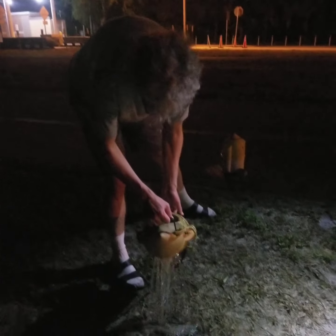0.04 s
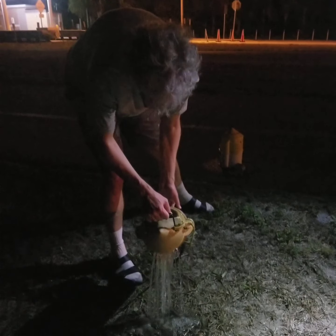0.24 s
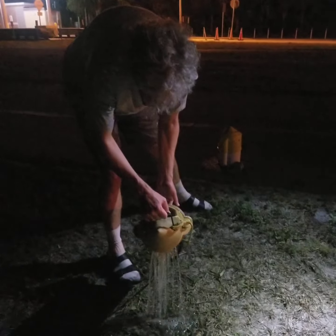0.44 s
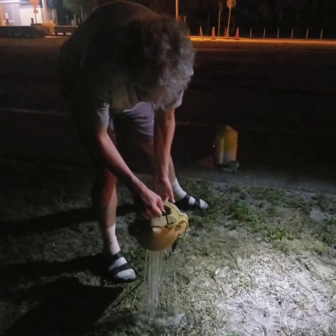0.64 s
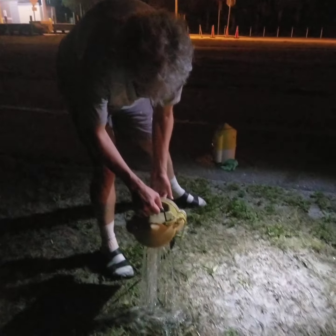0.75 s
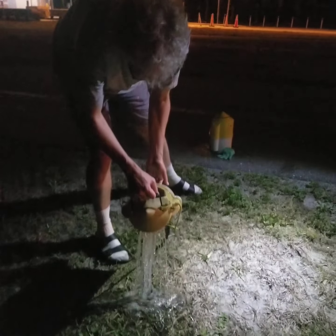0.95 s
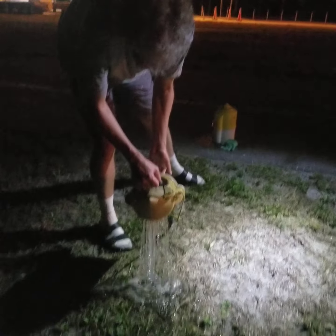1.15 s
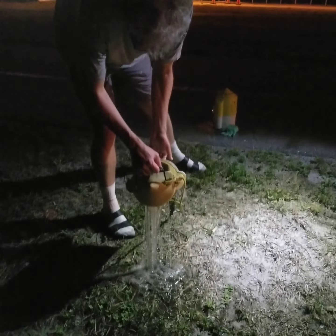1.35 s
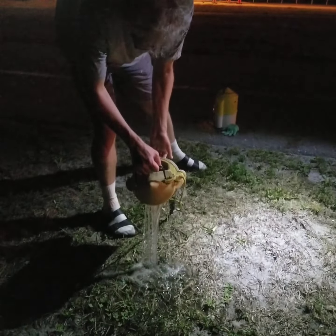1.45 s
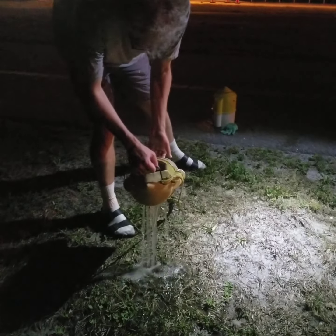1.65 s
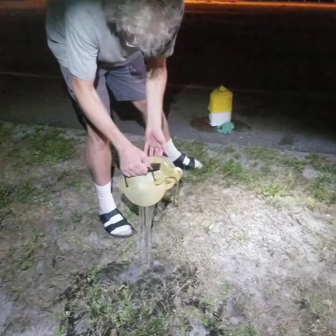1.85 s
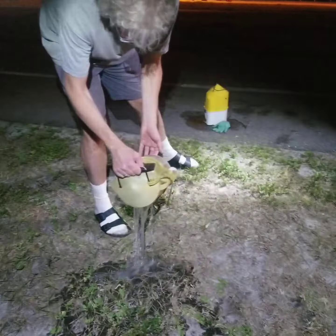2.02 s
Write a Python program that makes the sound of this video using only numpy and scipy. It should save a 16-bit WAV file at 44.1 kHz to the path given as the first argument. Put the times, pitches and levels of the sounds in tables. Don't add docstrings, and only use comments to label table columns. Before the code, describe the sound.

Water from a bucket splashes onto grass. A dense gush swells from 0 to 0.2 s, thuds low near 0.26 s and dies by 0.4 s. Hissing spray swells again around 0.9 s with dull soaking patter and soft glugs. From 1 s a thin stream crackles with sharp bright splats, densest near 1.95 s, continuing to 2.5 s. Low wind bumps, mostly early; very faint road hum.

```python
import sys
import numpy as np
from scipy import signal
from scipy.fft import rfft, irfft, next_fast_len
from scipy.io import wavfile
from scipy.ndimage import uniform_filter1d, map_coordinates

SR = 44100
rng = np.random.default_rng(int(sys.argv[2]) if len(sys.argv) > 2 else 0)


def unload_audio(sound):
    columns = np.transpose(np.atleast_2d(sound))
    steps = np.round(np.clip(columns, -1, 1) * 32767)
    wavfile.write(sys.argv[1], SR, steps.astype(np.int16))


def invert_db(x):
    u = np.asarray(x, float) / 20
    return 10 ** u


N = 110250


def unit(x):
    return x / np.sqrt(np.mean(x ** 2) + 1e-20)


def along(points, hz):
    f, v = np.transpose(points)
    return np.interp(np.log(hz + 1), np.log(f + 1), v)


def curves(rows):
    s, *columns = np.transpose(rows)
    return [np.interp(np.arange(N) / SR, s, column) for column in columns]


def wobble(rate_hz):
    knots = rng.standard_normal(int(N * rate_hz / SR) + 4)
    return map_coordinates(knots, [np.arange(N) * rate_hz / SR])


def filtered(x, response):
    m = next_fast_len(N + SR // 4)
    return irfft(rfft(x, m) * response(np.fft.rfftfreq(m, 1 / SR)), m)[..., :N]


def patchy(patchy_db):
    z = signal.stft(rng.standard_normal((3, N)), nperseg=256)[2]
    field = uniform_filter1d(rng.standard_normal(z.shape[1:]), size=8, axis=0)
    field = uniform_filter1d(field, size=5, axis=1)
    return signal.istft(z * invert_db(patchy_db * unit(field)), nperseg=256)[1][:, :N]


# frequency in Hz, unrelated share 0-1.
PORT_INCOHERENCE = [(200, 0.01), (800, 0.09), (2000, 0.17), (5000, 1), (12000, 0.38)]
MIRROR_DELAY_S, MIRROR_CUTOFF_HZ = 0.002112, 4500


def ports(trio, tones, lag_s, mirror):
    def paths(hz):
        loose = along(PORT_INCOHERENCE, hz)
        delay = np.exp(-2j * np.pi * hz * MIRROR_DELAY_S)
        echo = 1 + mirror * delay / (1 + (hz / MIRROR_CUTOFF_HZ) ** 2)
        tone = invert_db(np.array([along(points, hz) for points in tones])) * echo
        lag = np.exp(-1j * np.pi * hz * lag_s * np.array([[1], [-1]]))
        return tone * lag * np.sqrt(1 - loose), tone * np.sqrt(loose)
    shared = filtered(trio[[0, 0]], lambda hz: paths(hz)[0])
    pair = shared + filtered(trio[1:], lambda hz: paths(hz)[1])
    return pair / np.sqrt(np.mean(pair.mean(axis=0) ** 2))


def grains(start_s, hz, cycles, size):
    k = np.arange(600)
    turns = hz[:, None] * k / SR
    envelope = np.exp(-turns * 3 / cycles) * (1 - np.exp(-turns * 2))
    wave = size[:, None] * np.sin(2 * np.pi * turns) * envelope
    at = (start_s * SR).astype(int)[:, None] + k
    return np.bincount(at.ravel(), wave.ravel(), N + len(k))[:N]


# time in seconds, level in dB.
GUSH_LEVEL = [
    (0, -37),
    (.05, -35),
    (.18, -30),
    (.28, -33.5),
    (.34, -38),
    (.375, -45),
    (.41, -63),
    (.48, -76),
]
# frequency in Hz, level in dB per Hz.
GUSH_COLOUR = [
    [(150, -19), (400, -9.5), (900, -21.5), (3000, -19), (4500, -23), (7000, -21), (10000, -24),
     (15500, -9.5)],
    [(150, -17), (400, -4.5), (900, -12.5), (3500, -5.5), (4500, 6), (6600, -11), (11700, -9),
     (15500, -13.5)],
]
GUSH_LAG_S = -0.000093


def gush():
    level_db, = curves(GUSH_LEVEL + [(.6, -89)])
    noise = patchy(patchy_db=1.0) * invert_db(0.5 * wobble(119) + 0.22 * wobble(31))
    return invert_db(level_db) * ports(noise, GUSH_COLOUR, GUSH_LAG_S, mirror=0.03)


# frequency in Hz, level in dB per Hz.
SURGE_COLOUR = [(60, -11), (130, -2), (520, -7), (750, -24)]
SURGE_S, SURGE_WIDTH_S, SURGE_DB = 0.26, 0.048, -43


def surge():
    swell = np.exp(-((np.arange(N) / SR - SURGE_S) / SURGE_WIDTH_S) ** 2 / 2)
    thud = ports(patchy(patchy_db=3.0), [SURGE_COLOUR, SURGE_COLOUR], GUSH_LAG_S, mirror=0)
    return invert_db(SURGE_DB) * swell * thud * invert_db([[-3], [2]])


# time in seconds, level in dB.
SHEET_LEVEL = [
    (0, -42.5),
    (.35, -45),
    (.6, -48),
    (.9, -45.5),
    (1.05, -53.5),
    (1.45, -51),
    (1.8, -59),
    (2.5, -57.5),
]
# frequency in Hz, level in dB per Hz.
SHEET_COLOUR = [
    [(200, -10.5), (450, -19), (1500, -10), (3500, -12.5), (5500, -13), (7300, -10), (10000, -7.5),
     (15500, -11)],
    [(200, -9.5), (450, -12.5), (1500, -5), (3600, 2), (5500, -2), (7500, -7), (10800, -3), (15500, -8)],
]


def sheet():
    level_db, = curves(SHEET_LEVEL)
    noise = patchy(patchy_db=1.5) * invert_db(2.1 * wobble(150) + 0.84 * wobble(30.17))
    return invert_db(level_db) * ports(noise, SHEET_COLOUR, lag_s=-0.00011, mirror=-0.37)


# time in seconds, reading speed as a ratio.
TILT_SPEED = [(0, 0.93), (.95, 0.85), (1.4, .99), (2.5, 1.008)]


def tilted(pair):
    at = np.cumsum(curves(TILT_SPEED)[0])
    return np.array([map_coordinates(port, [at], mode="mirror") for port in pair])


# time in seconds, level in dB, break-up in dB.
STREAM_LEVEL = [(0, -50, 5), (.4, -50, 5.5), (.9, -56, 0.5), (1.0, -48, 1.3), (1.2, -46.5, 0.9),
                (1.45, -49.5, 2.5), (1.6, -53, 2), (1.8, -52, 1.8), (1.94, -48.5, 2.5), (2.0, -50.5, 6),
                (2.04, -52, 0), (2.2, -51.5, 2.3), (2.3, -53, 0.8), (2.4, -54, 3), (2.5, -55, 3)]
# frequency in Hz, level in dB per Hz.
STREAM_COLOUR = [
    [(1200, -79), (2400, -9.5), (4000, -8.5), (7600, -18), (8800, -7.5), (12500, -11), (15800, -13.5)],
    [(1200, -15.5), (2300, -8), (3700, -9), (4600, 1.5), (7600, -11), (10000, -7), (11800, -6),
     (15800, -12.5)],
]
# centre in Hz, width in Hz, lift in dB.
CAVITIES = [(4410, 320, 3.5), (11630, 340, 3.5), (13000, 600, 8), (2330, 67, 10.5), (3300, 590, 1),
            (1330, 210, 9)]
STREAM_LAG_S, SPLIT_HZ = -0.0002614, 8200
DROP_COUNT, DROPS_DB, DROP_SIZE_DB = 2500, -8.5, 15
DROP_HZ, DROP_SPREAD, DROP_CYCLES = 6030, 0.587, 5.4


def droplets():
    when, pitch, size = rng.random((DROP_COUNT, 3)).T
    hz = np.clip(DROP_HZ * np.exp(DROP_SPREAD * 4.18 * (pitch - .5)), 300, 15500)
    gain = invert_db(DROP_SIZE_DB * size ** 3) * np.sqrt(hz / DROP_HZ)
    return grains(when * (N - 1) / SR, hz, DROP_CYCLES, gain)


def cavity_lift(hz):
    lift_db = sum(db * np.exp(-((hz - c) / w) ** 2) for c, w, db in CAVITIES)
    return invert_db(lift_db * [[.3], [1]])


def stream():
    level_db, break_db = curves(STREAM_LEVEL)
    break_db = np.interp(np.arange(N), np.cumsum(curves(TILT_SPEED)[0]), break_db)
    common = 2.25 * wobble(350) + 0.4 * wobble(130) + 0.074 * wobble(45)
    noise = unit(patchy(patchy_db=3.0)) + invert_db(DROPS_DB) * unit(droplets())
    total = 0
    for low_hz, high_hz in [(0, 3300), (3300, SPLIT_HZ), (SPLIT_HZ, SR)]:
        clumps = invert_db(break_db * 2 * np.tanh((common + 0.37 * wobble(120)) / 2))
        clumps = clumps / np.sqrt(np.abs(uniform_filter1d(clumps ** 2, size=SR // 12)))
        total = total + filtered(clumps * noise, lambda hz: (hz >= low_hz) & (hz < high_hz))
    pair = ports(total, STREAM_COLOUR, STREAM_LAG_S, mirror=-0.15)
    return invert_db(level_db) * tilted(filtered(pair, cavity_lift))


# time in seconds, peak in dB, ring in Hz, treble share in dB, decay in seconds.
SPLAT_EVENTS = [(.405, -27.5, 5360, 9.5, 0.0016), (0.693, -44, 2500, 14, 0.0022),
                (.839, -30, 4300, 2, .002), (.896, -33, 4200, 10, 0.0024), (1.0036, -28, 4000, -6, .002),
                (1.044, -35, 4360, 14, .002), (1.1504, -29, 4360, 10, .002),
                (1.177, -26.5, 4330, 6, 0.0019), (1.3955, -27, 4500, -1, .002),
                (1.5054, -31, 4460, 9, 0.0025), (1.558, -32, 3480, 4, .002),
                (1.5837, -28, 4990, 7.5, 0.0014), (1.6258, -29.5, 4340, 9, 0.0018),
                (1.6807, -27.5, 4500, 6.5, 0.0017), (1.7343, -34, 4500, 8.5, .0016),
                (1.8066, -31.5, 4750, -2, 0.0024), (1.8575, -29.5, 4860, 8, 0.0016),
                (1.89, -27, 4300, 1, .0018), (1.9195, -30, 4970, 6, .0015),
                (1.9581, -19, 5660, -16, 0.0015), (1.9704, -30, 4100, 7, 0.002),
                (1.9744, -27, 4250, 2, 0.0018), (1.9832, -29, 4780, 1, .002),
                (1.9968, -29, 4400, 6, 0.0028), (2.0027, -31, 4360, 5, .002),
                (2.0554, -32, 2310, 5, 0.0025), (2.063, -30, 5010, -2, 0.0029),
                (2.089, -27, 5030, -5, .0012), (2.1383, -29, 4910, 2, 0.0015),
                (2.2018, -34, 4430, 2, .0014), (2.2295, -31, 5000, -2, .0014),
                (2.2454, -30, 4630, 4, .0022), (2.252, -32.5, 4600, -2, .0012),
                (2.3397, -31.5, 4500, 4, 0.0033), (2.3574, -30, 4900, 8, 0.0012),
                (2.3676, -27, 5500, -2, .0011), (2.3732, -28.5, 3600, 9, .0018),
                (2.3958, -31, 4270, 0, 0.0032), (2.4227, -29, 4960, 2, 0.0043),
                (2.4705, -33, 5560, 6, 0.0015)]
# frequency in Hz, level in dB per Hz.
SPLAT_COLOUR = [
    [(600, -32), (1500, -16), (4000, -9.5), (7600, -39), (8800, -9), (12500, -10), (15800, -8)],
    [(600, -35), (1700, -0.5), (3400, -1.5), (5000, -2), (7600, -1), (10000, -3), (12000, 1), (15800, -18)],
]
SPLAT_DB, SPLAT_RING_DB, SPLAT_RISE_S = -9.5, -3.5, 0.00019


def splats():
    t = np.arange(SR // 40) / SR
    layers = np.zeros((2, 3, N + SR))
    for s, peak_db, ring_hz, treble_db, decay_s in SPLAT_EVENTS:
        shape = invert_db(peak_db) * (1 - np.exp(-t / SPLAT_RISE_S)) * np.exp(-t / decay_s)
        hiss = rng.standard_normal((2, 3, len(t)))
        power = np.sum((hiss * shape) ** 2, axis=2, keepdims=True) / np.sum(shape ** 2)
        hiss = hiss / np.sqrt(power)
        ring = invert_db(SPLAT_RING_DB) * 2 * np.sin(2 * np.pi * (ring_hz * t + rng.random((3, 1))))
        burst = shape * np.array([hiss[0] + ring, invert_db(treble_db) * hiss[1]])
        layers[..., round(s * SR):][..., :len(t)] += burst
    layers = layers[..., :N]
    dull = filtered(layers[0], lambda hz: 1 / (1 + (hz / SPLIT_HZ) ** 8))
    bright = filtered(layers[1], lambda hz: 1 - 1 / (1 + (hz / SPLIT_HZ) ** 8))
    scale = np.sqrt(np.mean(layers[0] ** 2))
    return invert_db(SPLAT_DB) * scale * ports(dull + bright, SPLAT_COLOUR, STREAM_LAG_S, mirror=0.41)


# time in seconds, level in dB.
SOAK_LEVEL = [(0, -73), (.4, -64), (.9, -51), (1.15, -54.5), (1.45, -58.5), (1.6, -63), (1.75, -64.5),
              (1.9, -68), (2.2, -64.5), (2.35, -73.5), (2.5, -97)]
# frequency in Hz, level in dB per Hz.
SOAK_COLOUR = [
    [(150, -24), (350, -8), (700, -11.5), (1500, -13), (2600, -21), (4000, -48)],
    [(150, -27), (350, -3), (650, -2), (1500, -7.5), (2600, -17), (4000, -18)],
]


def soak():
    level_db, = curves(SOAK_LEVEL)
    noise = patchy(patchy_db=0.5) * invert_db(2.27 * wobble(70) + 0.28 * wobble(30.17))
    return invert_db(level_db) * ports(noise, SOAK_COLOUR, lag_s=-0.00012, mirror=-0.68)


# time in seconds, peak in dB, pitch in Hz.
GLUG_EVENTS = [(0.403, -44.5, 636), (0.511, -49, 686), (0.546, -45.5, 720), (0.585, -52, 704),
               (0.698, -52, 610), (0.863, -50, 611), (0.889, -53, 725), (1.031, -46.5, 576),
               (1.108, -49, 614), (1.149, -46.5, 660), (1.362, -46, 740), (1.399, -48, 610),
               (1.478, -46, 583), (1.676, -50.5, 620), (1.71, -52, 700), (1.732, -46.5, 700),
               (1.775, -52, 655), (1.969, -49, 692)]
GLUG_DB, GLUG_CYCLES = -1.5, 7.9


def glugs():
    s, peak_db, hz = np.transpose(GLUG_EVENTS)
    return invert_db([[-4], [3]]) * grains(s, hz, GLUG_CYCLES, invert_db(peak_db + GLUG_DB) * 2)


# time in seconds, left port in dB, right port in dB.
WIND_LEVEL = [(0, -56.5, -48.5), (.2, -38, -60), (.28, -40.5, -48), (.45, -52, -59.5), (1.05, -51.5, -55.5),
              (1.2, -53, -50.5), (1.4, -64, -44), (1.65, -50.5, -58.5), (1.9, -62.5, -65.5),
              (2.5, -64.5, -64)]
# frequency in Hz, level in dB per Hz.
BUFFET_COLOUR = [(11, -22), (24, 3), (71, 5), (87, 3.5), (187, -9.5), (300, -20), (390, -29), (660, -120)]


def wind():
    noise = filtered(rng.standard_normal((2, N)), lambda hz: invert_db(along(BUFFET_COLOUR, hz)))
    lumps = invert_db(3.4 * np.array([wobble(22.53), wobble(21.66)]))
    return invert_db(curves(WIND_LEVEL)) * unit(lumps * noise)


# time in seconds, peak in dB.
THUMP_EVENTS = [
    [(.08, -27.5), (.18, -37), (.28, -28.5), (.63, -43), (.87, -38.5), (.92, -42.5), (1.02, -33),
     (1.09, -39), (1.48, -47), (1.64, -41.5), (1.75, -43), (1.97, -49)],
    [(.14, -43), (.34, -40), (1.16, -45), (1.28, -37.5), (1.4, -50), (1.57, -52)],
]
THUMP_HZ, THUMP_S = 72.5, 0.0084


def thumps():
    t, out = np.arange(N) / SR, np.zeros((2, N))
    for port, rows in enumerate(THUMP_EVENTS):
        for s, peak_db in rows:
            hz = THUMP_HZ * np.exp(0.34 * rng.standard_normal())
            swing = np.sin(2 * np.pi * (hz * (t - s) + rng.random()))
            out[port] += invert_db(peak_db) * np.exp(-((t - s) / THUMP_S) ** 2 / 2) * swing
    return out


# frequency in Hz, level in dB per Hz.
ROAD_COLOUR = [(30, -14), (200, -27), (500, -62), (2000, -40), (8000, -22), (16000, -42)]
ROAD_DB = -65


def road():
    noise = rng.standard_normal((2, N))
    return invert_db(ROAD_DB) * unit(filtered(noise, lambda hz: invert_db(along(ROAD_COLOUR, hz))))


def scene():
    water = gush() + surge() + sheet() + stream() + splats() + soak() + glugs()
    return water + wind() + thumps() + road()


def roll_off(x):
    return signal.sosfilt(signal.butter(12, 16640, fs=SR, output="sos"), x)


# centre in Hz, width in Hz, depth 0-1.
HOUSING_DIPS = [(7745, 260, 0.7), (7090, 200, 0.65), (6210, 71, 0.6), (3570, 420, 0.13), (8700, 470, 0.31)]
TOP_HZ = 15980


def record(dry):
    def housing(hz):
        dips = [1 - depth * np.exp(-((hz - c) / w) ** 2) for c, w, depth in HOUSING_DIPS]
        return np.prod(dips, axis=0) * (hz < TOP_HZ)
    return roll_off(filtered(dry, housing))


dry = scene()
out = record(dry)
unload_audio(out)
```